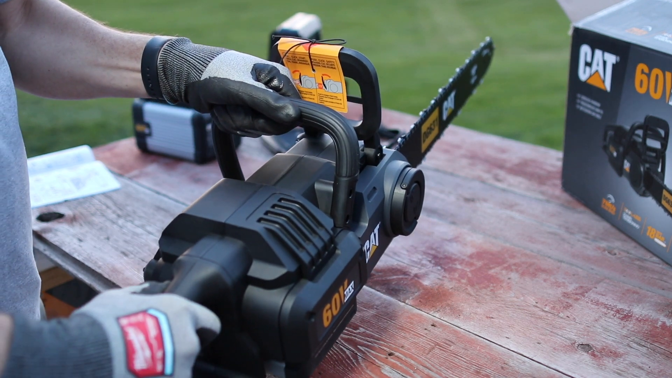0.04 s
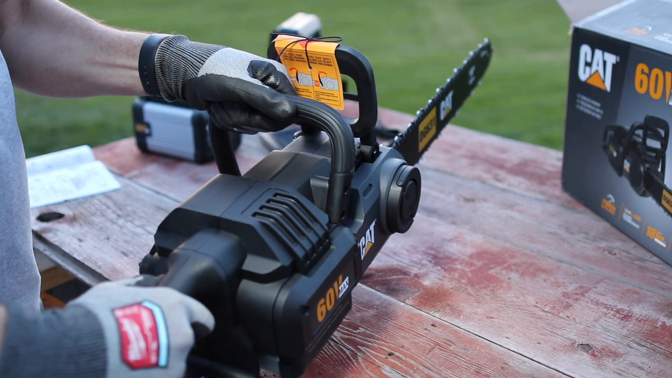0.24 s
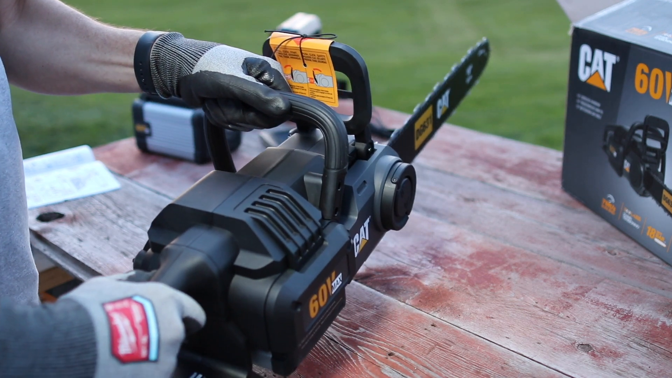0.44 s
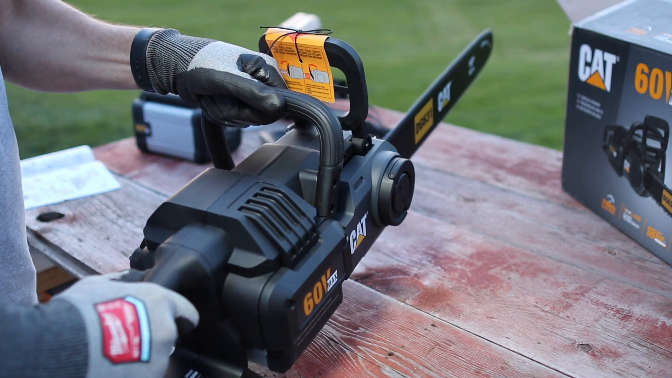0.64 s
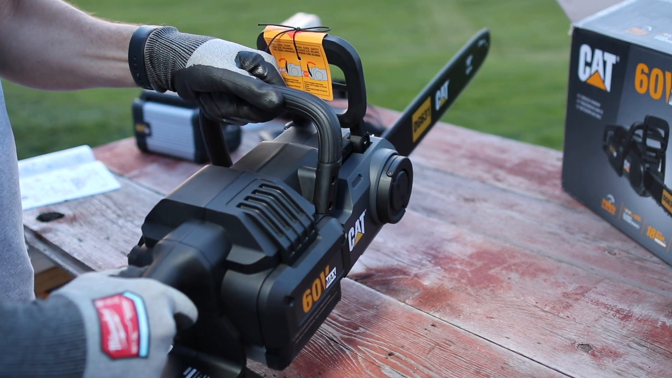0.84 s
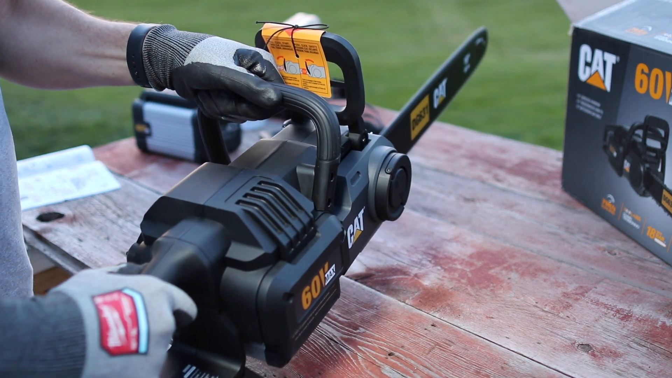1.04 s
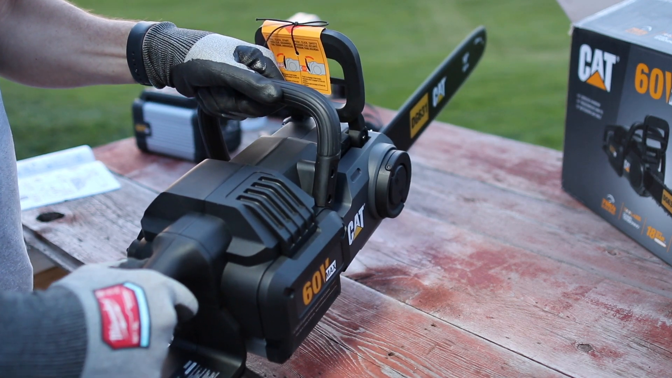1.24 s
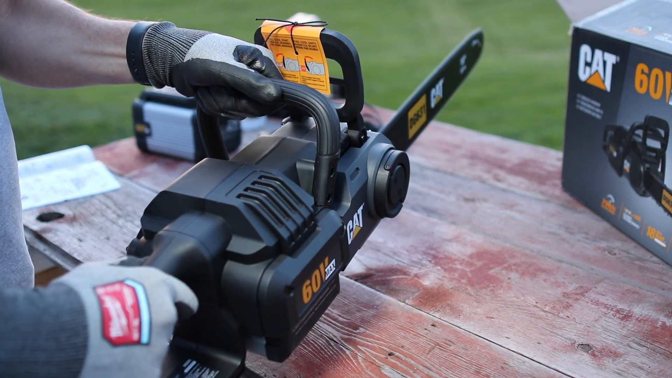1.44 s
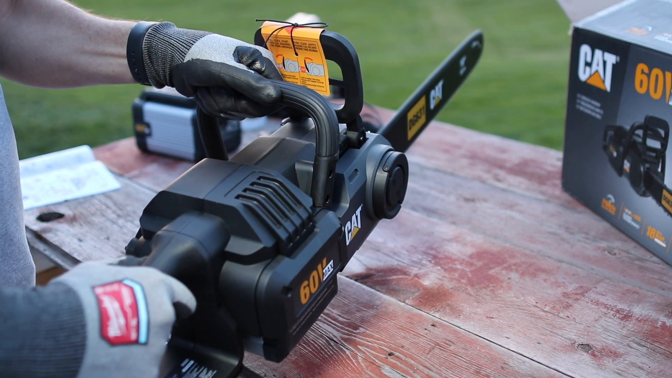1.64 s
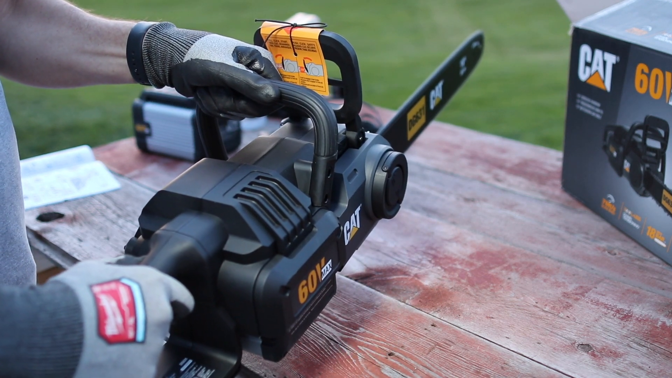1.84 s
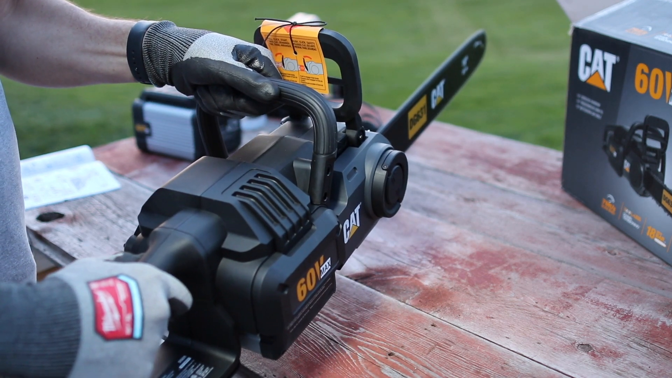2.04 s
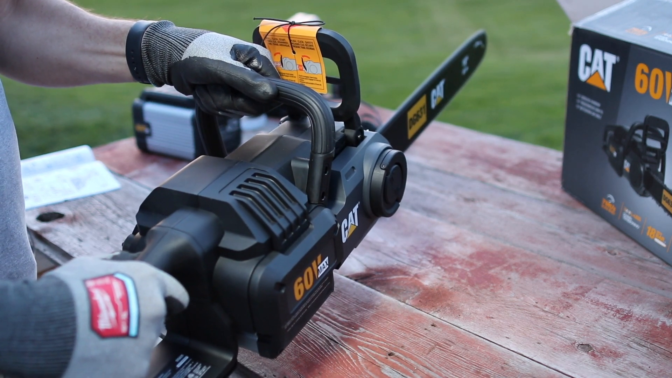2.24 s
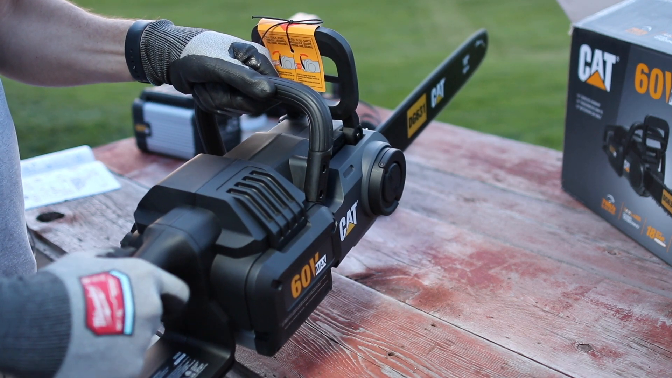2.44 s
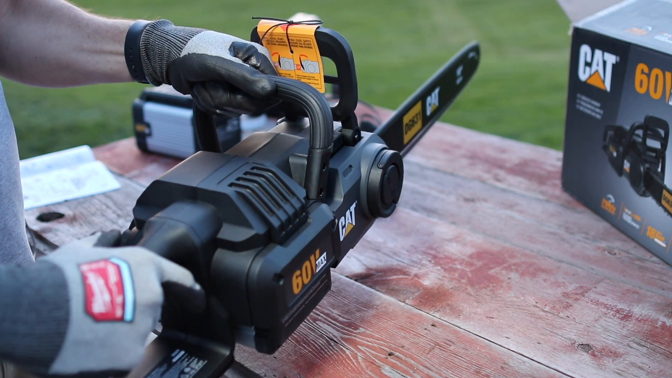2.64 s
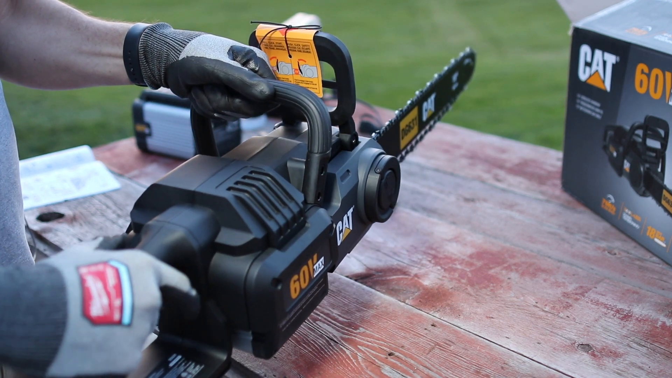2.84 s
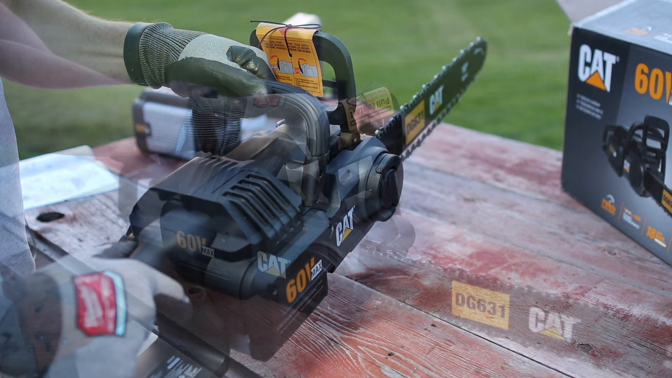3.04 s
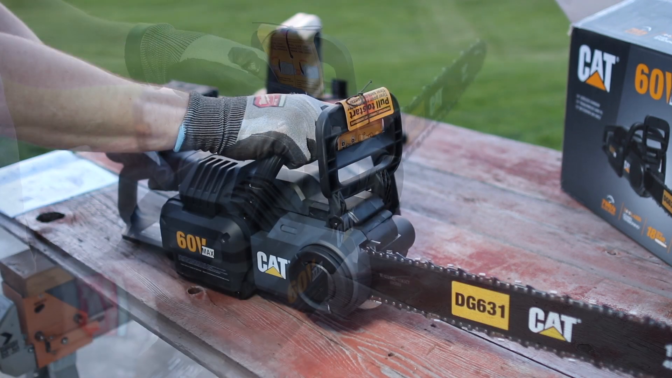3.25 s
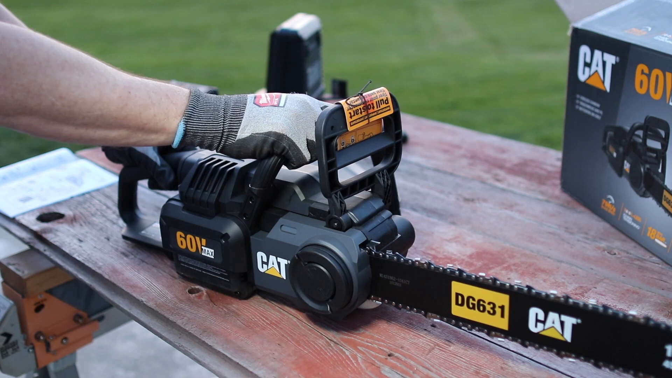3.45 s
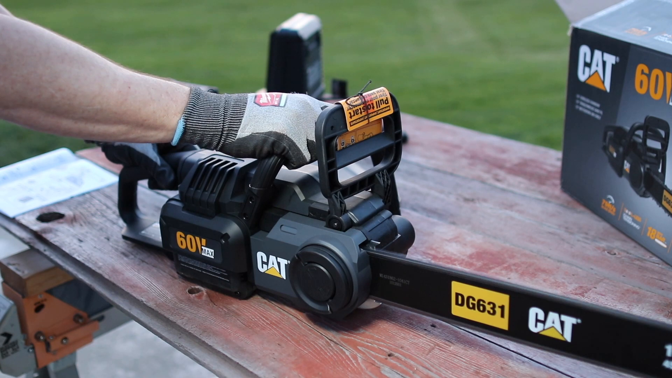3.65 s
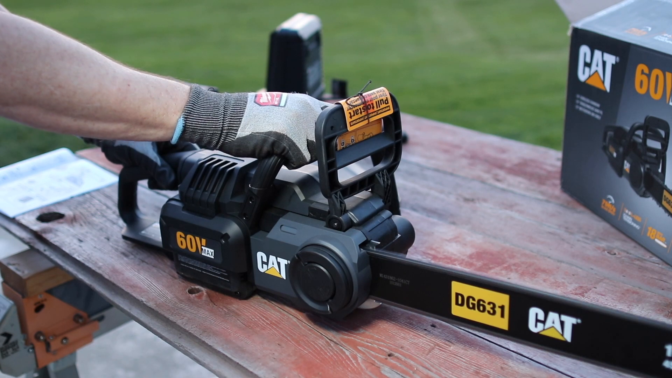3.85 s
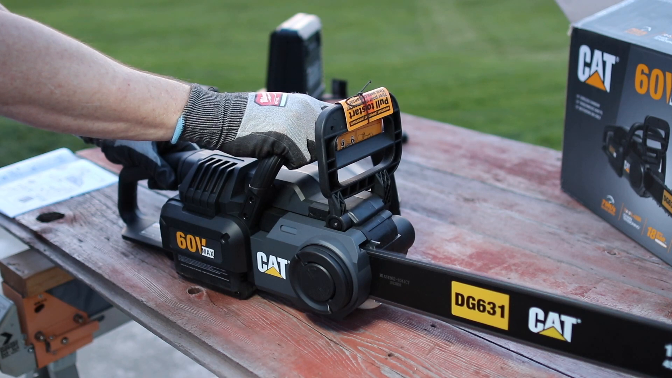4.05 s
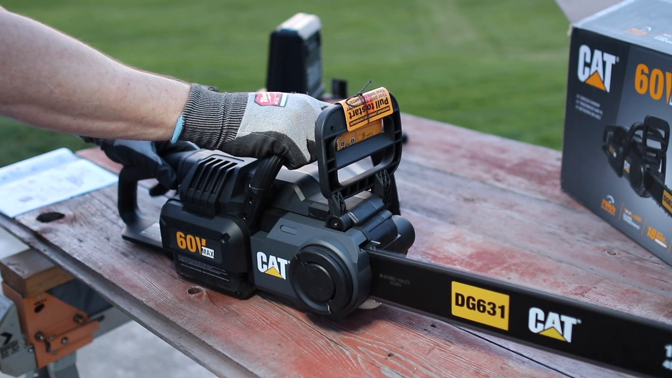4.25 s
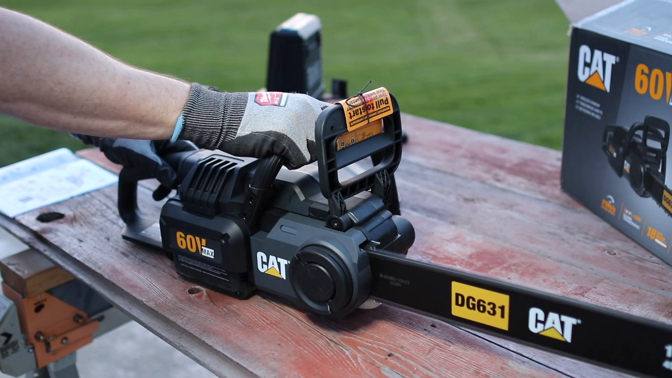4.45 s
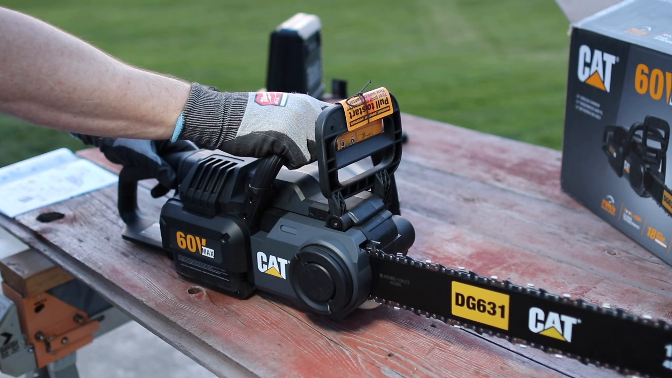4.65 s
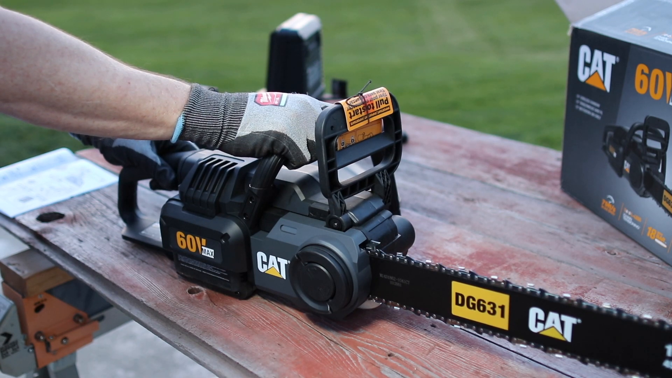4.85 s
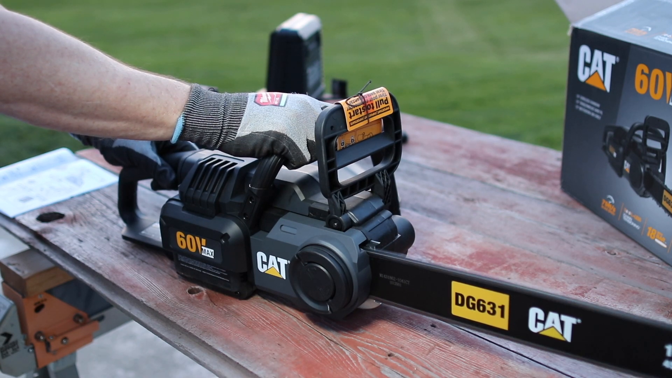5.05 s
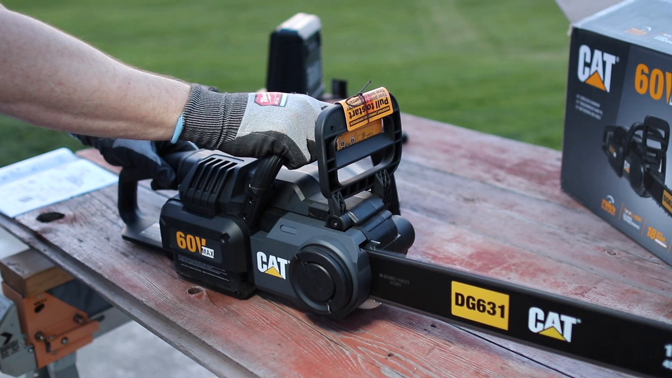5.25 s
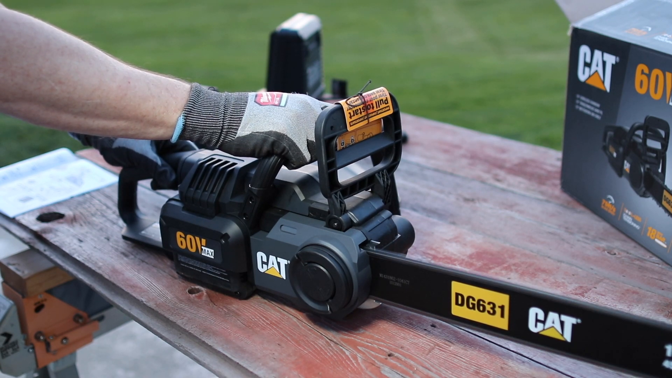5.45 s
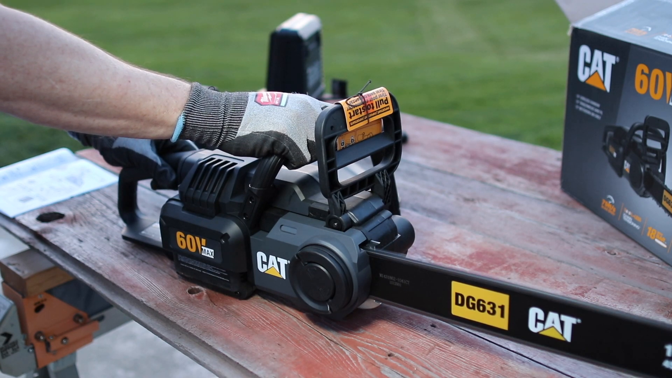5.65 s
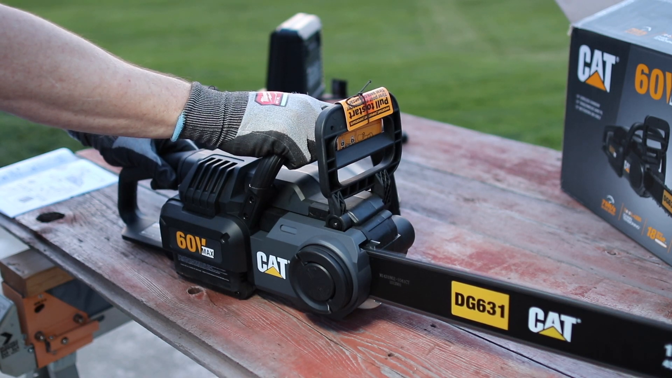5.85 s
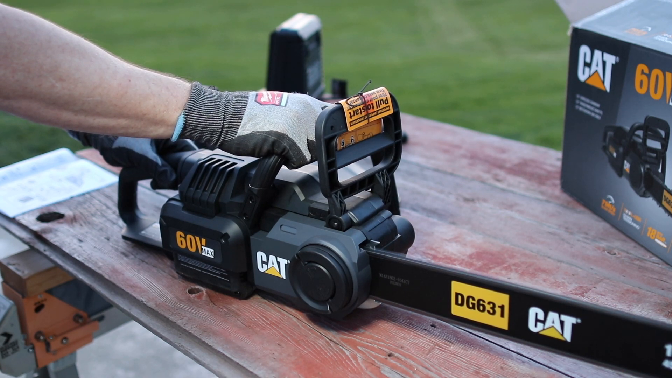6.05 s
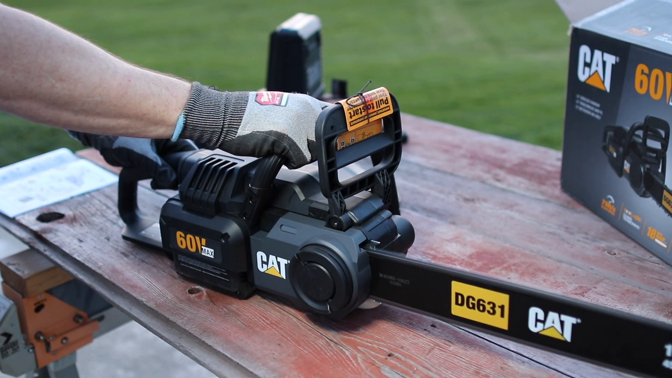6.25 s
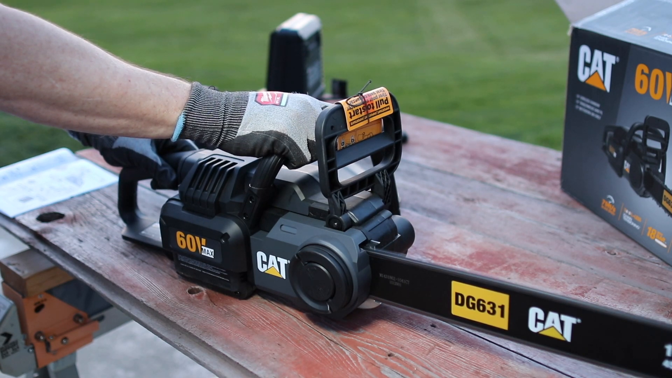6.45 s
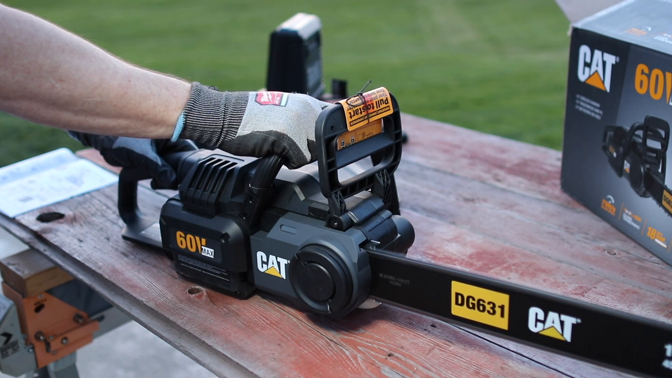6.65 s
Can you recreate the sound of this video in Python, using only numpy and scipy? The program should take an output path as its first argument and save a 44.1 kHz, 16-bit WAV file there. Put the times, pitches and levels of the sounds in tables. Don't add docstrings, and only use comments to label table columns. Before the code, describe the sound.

A cordless electric chainsaw revs freely three times on an outdoor table, trigger clicking, motor whining over hissing chain, quiet garden air between the runs.

```python
import sys
import numpy as np
from scipy import signal
from scipy.fft import rfft, irfft
from scipy.io import wavfile
from scipy.ndimage import uniform_filter1d

SR = 44100
rng = np.random.default_rng(int(sys.argv[2]) if len(sys.argv) > 2 else 0)


def undo_db(level):
    steps = np.asarray(level, float) / 20
    return 10 ** steps


def transcribe(u):
    v = np.clip(np.atleast_2d(u).T, -1, 1)
    q = np.round(v * 32767).astype(np.int16)
    wavfile.write(sys.argv[1], SR, q)


N = 295853
T = np.arange(N) / SR
TURNED_S = 2.5
TOP_HZ = 15830
LINKS = 62

# ramp start in seconds, full cutter rate in Hz, drift in Hz per second,
# trigger release in seconds, braking in Hz per second.
SPEEDS = [
    (.411, 623.15, 5, 2.49, 2220),
    (3.506, 623, 0, 4.233, 2310),
    (4.930, 622.25, -4.5, 7, 2250),
]
# time in seconds, level in dB.
LEVELS = [
    [(.47, -14.5), (.48, -34), (.5, -25.5), (.53, -15.5), (1.0, -17.5), (2.6, -18.5), (2.64, -25),
     (2.75, -27), (2.792, -35), (2.81, -54), (2.83, -51)],
    [(3.52, -26.5), (3.544, -30), (3.559, -28), (3.57, -16), (3.678, -17), (3.768, -18.5), (4.3, -21.5),
     (4.44, -20.5), (4.49, -24.5), (4.55, -65)],
    [(4.94, -36), (4.96, -33), (4.978, -29.5), (4.99, -23), (5.004, -20), (5.048, -16), (5.25, -19.5),
     (5.4, -18.5), (5.7, -21.5), (6.709, -23)],
]


def unit(x):
    return x / np.sqrt(np.mean(x ** 2))


def walk(rate):
    k = int(SR / rate)
    held = np.repeat(rng.standard_normal(N // k + 1), k)
    return 1.3 * uniform_filter1d(uniform_filter1d(held, k), k)[:N]


def band(x, lo, hi):
    return signal.sosfilt(signal.butter(2, [lo, hi], "band", fs=SR, output="sos"), x)


def lowpass(x, hz, order):
    return signal.sosfilt(signal.butter(order, hz, fs=SR, output="sos"), x)


def colour(x, shape, modes=(), echo=(0, 0), size=4096):
    hz = np.maximum(np.arange(size // 2 + 1) * SR / size, 1)
    shape_hz, shape_db = np.transpose(shape)
    db = np.interp(np.log(hz), np.log(shape_hz), shape_db)
    for f, width, lift_db in modes:
        db = db + lift_db / (1 + (2 * (hz - f) / width) ** 2)
    cepstrum = irfft(np.log(undo_db(db)))
    cepstrum[1:size // 2] *= 2
    cepstrum[size // 2 + 1:] = 0
    bounce = 1 + echo[1] * np.exp(-2j * np.pi * hz * echo[0])
    return signal.fftconvolve(x, irfft(np.exp(rfft(cepstrum)) * bounce))[:N]


def garden():
    # frequency in Hz, dB per Hz.
    air_shape = [(15, -41.5), (25, -8), (48, -10.5), (76, 1), (489, -7.5), (1040, -12), (1370, -23),
                 (2110, -22), (4140, -24.5), (5730, -30), (16000, -38)]
    # time in seconds, level in dB.
    ambient_db = [(0, -53), (.074, -48.5), (.2, -61), (.44, -51), (2.86, -61.5), (3.216, -54.5),
                  (3.376, -58.5), (3.5, -56.5), (4.55, -46.5), (4.62, -59), (4.796, -62.5), (4.878, -56),
                  (4.93, -63)]
    # time in seconds, level in dB.
    gusts_db = [(0, -61), (.12, -63), (.3, -54.5), (.5, -58), (2.6, -62.5), (2.75, -68.5), (3.1, -67.5),
                (3.25, -58), (3.45, -62.5), (4.5, -62), (4.65, -73), (4.8, -62.5), (6.7, -67)]
    modes = [(1413, 460, 14.0), (3100, 710, 4.9), (4630, 800, 4)]  # Hz, width Hz, lift dB
    air = colour(rng.standard_normal(N), air_shape, modes)
    leaves = colour(rng.standard_normal(N), air_shape, modes)
    traffic_db = np.interp(T, *np.transpose(ambient_db))
    wind_db = np.interp(T, *np.transpose(gusts_db))
    traffic = undo_db(traffic_db + 2.5 * walk(8.3)) * unit(band(air, 120, 2600))
    rustle = undo_db(traffic_db - 6 + 2 * walk(25)) * unit(band(leaves, 1500, 16000))
    wind = undo_db(wind_db + 3 * walk(9)) * unit(band(air, 22, 150))
    return traffic + rustle + wind


def microphone_hiss():
    # time in seconds, level in dB.
    hiss_db = [(0, -63), (3.1, -78), (3.25, -64), (3.5, -61.5), (4.6, -76), (6.7, -76)]
    return undo_db(np.interp(T, *np.transpose(hiss_db))) * rng.standard_normal(N)


def whistles(rows):
    out, waver = np.zeros(N), walk(90)
    for start, end, hz0, hz1, db in rows:
        span = slice(int(start * SR), int(end * SR))
        along = np.clip((T[span] - start) / (end - start), 0, 1)
        pitch = hz0 + (hz1 - hz0) * along ** 1.8
        swell = np.sqrt(np.sin(np.pi * along))
        level = undo_db(db + 2.5 * np.roll(waver, hz0)[span])
        out[span] += level * swell * np.sin(2 * np.pi * np.cumsum(pitch) / SR)
    return out


def far_engine():
    # start and end in seconds, start and end pitch in Hz, level in dB.
    hums = [(0, .14, 1450, 1400, -58), (2.7, 2.95, 1110, 1120, -57), (2.93, 3.25, 1110, 1260, -57),
            (2.8, 3.05, 690, 700, -64), (2.8, 3.05, 530, 545, -65), (4.17, 4.33, 190, 190, -46),
            (2.66, 2.9, 165, 160, -58), (2.9, 3.04, 165, 155, -55), (2.98, 3.2, 2850, 3000, -64),
            (3.4, 3.435, 3050, 3000, -60), (4.48, 4.6, 175, 150, -47), (4.48, 4.59, 250, 230, -49),
            (4.5, 4.75, 310, 290, -60), (4.6, 4.75, 250, 250, -63), (3.16, 3.22, 160, 190, -55),
            (.21, .29, 1150, 1140, -59)]
    return whistles(hums)


def birds():
    # start and end in seconds, start and end pitch in Hz, level in dB.
    chirps = [(.06, .1, 3600, 4600, -62), (.08, .1, 4600, 5200, -63), (.33, .365, 4700, 4500, -61),
              (.33, .36, 4150, 4050, -60), (.4, .44, 3850, 3750, -62), (3.09, 3.12, 4200, 3900, -69),
              (3.27, 3.3, 4300, 3700, -60), (3.43, 3.48, 4350, 3300, -55), (3.49, 3.51, 3700, 3900, -57)]
    return whistles(chirps)


def snaps(rows, pure, rough, snap_t60, less_db, rise):
    # frequency in Hz, width in Hz, lift in dB.
    crack_modes = [(4900, 800, 12), (6700, 1000, 12), (8700, 800, 2), (15000, 1500, 3)]
    crack_shape = [(1500, -18), (3000, 5), (16000, -23)]  # Hz, dB
    crack_t60, handle_t60, thud_t60 = 0.013, 0.066, 0.19
    handle_hz, handle_near_db, handle_far_db = 382, -22, -33.5
    out, t = np.zeros(N + 4000), np.arange(4000) / SR
    for s, db, hz, crack_db in rows:
        turned = s > TURNED_S
        noise = rng.standard_normal((4, len(t)))
        ring = pure * np.sin(2 * np.pi * hz * t)
        ring += rough * .3 * unit(band(noise[0], hz / 1.2, hz * 1.2))
        ring += rough * .53 * unit(band(noise[3], 500, 2800))
        decay = undo_db(-60 * t / snap_t60)
        crack = unit(colour(noise[1], crack_shape, crack_modes * turned, size=256)[:len(t)])
        crack *= undo_db(-60 * t / crack_t60) + 0.05 * decay
        snap = decay * np.minimum(t * hz / rise, 1) * 0.54 * ring + undo_db(crack_db - 5) * crack
        handle_db = handle_far_db if turned else handle_near_db
        handle = undo_db(handle_db - 60 * t / handle_t60) * np.sin(2 * np.pi * handle_hz * t)
        thud_db = -40.5 - 0.53 * db + less_db + 2.5
        thud = undo_db(thud_db - 60 * t / thud_t60) * unit(band(noise[2], 30, 220))
        start = int((s + .001) * SR)
        out[start:start + len(t)] += undo_db(db) * (snap + handle + thud)
    return out[:N]


def trigger_clicks():
    # time in seconds, peak in dB, ring in Hz, crack in dB.
    contacts = [(.154, -34, 2470, -1), (0.158, -19.5, 500, -15), (0.167, -26, 500, -14),
                (0.1817, -12.5, 1290, 1.5), (0.191, -13.5, 1900, -21), (.191, -15, 410, -40),
                (0.212, -24.5, 2680, -0.5), (2.616, -12, 302, -27.5), (2.62, -13, 90, -49),
                (2.833, -42, 2400, 2), (2.845, -38, 1050, -22), (2.883, -49, 1120, 0),
                (2.929, -37, 1190, -32), (3.067, -36.5, 2100, -15), (3.189, -37, 2180, 1),
                (3.196, -37.5, 2500, 0), (3.201, -31, 260, -39), (3.204, -37, 1100, -30),
                (3.2383, -16, 2980, -2), (3.24, -10, 915, -34), (3.269, -37, 4800, -7),
                (3.272, -36, 2700, -16), (3.5095, -23, 4330, -14), (4.788, -38, 2380, -12),
                (4.805, -28, 606, -22), (4.8228, -29, 3000, -3), (4.8258, -9.5, 844, -6.5),
                (4.837, -12, 1870, -12), (4.932, -27, 4170, -17)]
    return snaps(contacts, pure=0.52, rough=0.99, snap_t60=.032, less_db=-2, rise=1.4)


def cutter(start, full_hz, drift, release, brake):
    inertia_s, brake_lag_s, brake_bite_s = .05, .04, .07
    up = np.clip(np.minimum(T, release) - start, 0, None)
    down = np.clip(T - release - brake_lag_s, 0, .5)
    down = uniform_filter1d(down, int(brake_bite_s * SR))
    ramp = 956 * up - 186 * np.minimum(up, 1) ** 2
    hz = np.minimum(ramp, full_hz + drift * (up - .8))
    hz = uniform_filter1d(hz, int(inertia_s * SR))
    hz = hz - brake * down + 1900 * down ** 2
    return np.maximum(hz, 20), np.clip(down / brake_lag_s, 0, 1)


def lap(link, side, size=4096):
    # beats per lap, dB over the scrape from behind, dB from the bar side.
    worn_links = [(13, 0, -6), (25, 0, 1), (44, 2, -6), (49, -1, 1), (55, -6, 4), (61, 1, 4), (63, 0, 2),
                  (69, -6, 4), (75, 6, 1), (87, 6, 2), (91, -6, 5), (95, 3, 0), (97, -6, 6), (107, -6, 5),
                  (111, 3, 5), (117, -6, 3), (122, -6, 3), (133, -6, 4), (160, 3, 1), (169, -6, 4),
                  (217, 1, 6), (224, -6, 4), (228, -6, 3), (257, -6, 3), (341, -8, 3), (403, 2, -8),
                  (434, 1, 2)]
    lap_db, fade_beats = (-7, -3)[side], 220
    beats = np.arange(size // 2 + 1)
    chance = rng.standard_normal((2, len(beats)))
    lines = undo_db(lap_db) * (chance[0] + 1j * chance[1]) / np.sqrt(2)
    lines = lines / (1 + (beats / fade_beats) ** 2)
    for beat, *db in worn_links:
        lines[beat] *= undo_db(db[side]) / abs(lines[beat])
    table = irfft(lines) * size * .0213
    return np.interp(link / LINKS % 1 * size, np.arange(size + 1), np.append(table, table[0]))


def chain(turns, taut, side, wear_db=-2.5, scatter_db=-0.5, scrape=0.8, strike_db=-16.5):
    link = 6 * turns
    count = link.astype(int)
    wear, sign = rng.standard_normal((2, LINKS))
    scatter = rng.standard_normal(count[-1] + 1)[count]
    size = undo_db(wear_db * wear[count % LINKS] + scatter_db * scatter)
    strikes = np.diff(count, prepend=0) * size * sign[count % LINKS]
    scrapes = rng.standard_normal(N) * (1 + size * np.exp(-(link - count) / scrape))
    return undo_db(strike_db) * unit(strikes) + unit(scrapes) + taut * lap(link, side)


def tones(turns, hz, orders, levels_db):
    out = 0
    for k, db in zip(orders, levels_db):
        waver_db = np.interp(hz, [195, 205], [1.5, .4]) * walk(29.98)[:len(hz)]
        audible = k * hz < TOP_HZ
        out = out + undo_db(db + waver_db) * audible * np.sin(2 * np.pi * k * turns + k * k)
    return out


def motor_song(turns, cutter_hz, shaft_hz, braking, tone_db, torque_db, live, side):
    teeth_turns = [2, 3, 5, 6, 8, 9, 12, 15, 18, 24]
    pole_turns = [7, 14, 28, 42]
    # level in dB, then dB added when slow, at full speed, while braking.
    teeth = [
        [(-13, -5, 1.5, -4), (-2.5, -8, -2.5, 1), (-8.5, -2, -1, 0), (4, -4, -1.5, 1), (-14, 1, -1, 1),
         (-9.5, -7, 1.5, 4.5), (-2.5, -4.5, -5, -12), (-15, 2, -4, 3), (-14.5, 0.5, 3, -3), (-15.5, 4, -1.5, 1)],
        [(-34, 0, -2, 0), (-2, -2, -0.5, 4), (-17.5, 0, -0.5, 1), (3, -1.5, 0, 5), (-10, -4, 7, 0),
         (-8, -5, -5, 0), (0.5, 3, 0, -1.7), (-15, -5, -4, 0), (-5.5, 9.5, 6, 1), (-22, 16.5, 10, 0)],
    ]
    # start and end in seconds, level in dB.
    pole_pulls = [
        [(2.55, 2.63, -11.5), (4.28, 4.33, -9)],
        [(2.543, 2.642, 0.5), (4.28, 4.32, 1), (4.32, 4.352, 8)],
        [(2.56, 2.582, 1), (2.584, 2.598, -1)],
        [(0.546, 0.574, -2)],
    ]
    slow = np.interp(cutter_hz, [200, 450], [1, 0])
    full = np.interp(cutter_hz, [585, 615], [0, 1])
    levels_db = []
    for k, (db, slow_db, full_db, brake_db) in zip(teeth_turns, teeth[side]):
        by_speed_db = torque_db if k > 6 else tone_db
        state_db = slow_db * slow * (1 - braking) + full_db * full + brake_db * braking
        levels_db.append(db + state_db + by_speed_db)
    for rows in pole_pulls:
        lift = sum((db + 61.5) * (T > start) * (T < end) for start, end, db in rows)
        levels_db.append(uniform_filter1d(lift, size=300) - 61.5)
    sines = np.zeros(N)
    live_db = [db[live] for db in levels_db]
    sines[live] = tones(turns[live], shaft_hz[live], teeth_turns + pole_turns, live_db)
    return sines


def saw(speed, level, shape, modes, nulls, echo, side):
    # cutter rate in Hz, hiss in dB, sprocket tone in dB, torque whine in dB.
    by_speed = [
        [(40, -1.5, -6, -7), (121, -12.5, -23, 0), (183, -5.5, 4, 9.5), (250, -7.5, -19, -5),
         (315, -4.5, -6.5, -2), (363, -4, -0.5, -0.5), (400, -5.5, -2.5, 1), (440, -4, -8, -3.5),
         (530, -5, -4.5, -7), (595, -6, -5, -12), (606, -4.5, -4.5, -14.5)],
        [(49.7, -7.5, 13, 4), (118, -7.5, -4, -11), (150, -7, -5, -9), (183, -7.5, -1, -5.5),
         (224, -8, -6, -2.5), (265, -5.5, -19, -6), (338, -4.5, -14, -4), (488, -4, -2.5, 1.5),
         (540, -5, -6, -6), (590, -1.5, -6.5, 0.5), (605, -2, -2, -2.5)],
    ]
    # dB added while braking to hiss, sprocket tone and torque whine.
    brake_mix_db = [
        (0, -0.5, 4.5),
        (0, -6, -0.5),
    ]
    rumble_hz, slap, damped = (318, 420)[side], (0.53, 1.45)[side], (0.32, 0)[side]
    cutter_hz, braking = cutter(*speed)
    level_s, level_db = np.transpose(level)
    db = np.interp(T, level_s, level_db)
    on = uniform_filter1d(1. * (T > level_s[0]) * (T <= level_s[-1]), size=400)
    at_hz, *mix = np.transpose(by_speed[side])
    hiss_db, tone_db, torque_db = (np.interp(cutter_hz, at_hz, column) + brake * braking
                                   for column, brake in zip(mix, brake_mix_db[side]))
    hiss_db = hiss_db + 6 * np.interp(T, [2.595, 2.628, 2.628 + .006], [0, 1, 0])

    shaft_hz = cutter_hz / 3 * (1 + .0006 * walk(12))
    turns = np.cumsum(shaft_hz) / SR
    rattle = colour(chain(turns, cutter_hz / speed[1], side), shape, modes, echo)
    hiss = signal.sosfilt(signal.butter(3, 3700, "high", fs=SR, output="sos"), rattle)
    body = lowpass(rattle, 3700, 3)
    rumble = lowpass(body, rumble_hz, 2)
    body = body - rumble * (1 - np.clip(shaft_hz / 200, 0, 1.1) ** 2.2)

    sines = motor_song(turns, cutter_hz, shaft_hz, braking, tone_db, torque_db, on > 0, side)
    driven = [(f, width, 1.13 * lift_db) for f, width, lift_db in modes]
    sung = colour(sines, shape, driven + nulls, echo) / np.std(body)
    sung = band(sung, 310, 15000)
    slack = np.clip(1 - cutter_hz / 300, 0, 1)
    sung = sung * undo_db(-6 * slack)
    body = body + slap * slack * undo_db(2.5 * walk(120)) * band(body, 550, 1500)
    body = body - damped * np.minimum(2 * slack, 1) * band(body, 970, 1300)
    flutter = undo_db(0.29 * walk(17))
    noise = flutter * (body / np.std(rattle) + undo_db(hiss_db) * unit(hiss))
    return on * undo_db(db) * (noise + undo_db(-3) * sung)


def run_from_behind():
    # frequency in Hz, dB per Hz.
    shape = [(18, -57), (30, -29), (233, -18.5), (415, -13.5), (569, -8.5), (616, -8), (937, -4),
             (1220, -4.5), (1320, -5.5), (1540, -0.5), (2480, -7), (11700, -9), (16000, -15.5)]
    # frequency in Hz, width in Hz, lift in dB.
    modes = [(361, 130, 5), (1077, 104, 7), (1560, 91, 1.5), (2100, 120, 3.5), (2415, 71, 0),
             (3230, 81, 3.5), (2815, 220, 4), (4340, 220, 2.5), (5500, 220, 3), (6170, 69, -7.5),
             (6570, 160, 2.5)]
    shroud = [(8760, 50, 5.5)]
    # frequency in Hz, width in Hz, lift in dB.
    nulls = [(800, 640, -10.5), (900, 90, -4), (1400, 420, -11), (1900, 60, -2), (2260, 240, -4.5),
             (3320, 1200, -8.5)]
    table_echo = (0.000342, 0.095)
    return saw(SPEEDS[0], LEVELS[0], shape, modes + shroud, nulls, table_echo, side=0)


def controller():
    # start and end in seconds, start and end pitch in Hz, level in dB.
    coil_tones = [(0.453, 0.459, 11800, 11500, -23), (.458, 0.511, 12000, 11860, -37),
                  (0.461, 0.51, 6050, 5960, -45), (3.511, 3.516, 11400, 11400, -33),
                  (3.518, 3.56, 11940, 12000, -52.5), (4.934, 4.937, 11200, 11000, -47),
                  (5.01, 5.054, 167, 165, -34), (3.575, 3.632, 175, 161, -33)]
    return whistles(coil_tones)


def chain_snatches():
    # time in seconds, peak in dB, ring in Hz, crack in dB.
    jerks = [(0.4532, -20, 2760, 7), (0.456, -13, 1500, -10), (0.4605, -9, 1930, -28),
             (0.4652, -1, 400, -42), (.4656, -24, 725, -29), (0.4688, -2.5, 1220, -28),
             (0.466, -2, 1430, -43), (0.4655, -7.5, 2920, -23), (0.5041, -4, 1306, -21),
             (0.508, -1.5, 970, -29), (0.51, -6, 1170, -23), (.519, -22, 1090, -16),
             (3.5135, -14, 790, -30), (3.5153, -2, 1290, -30), (3.52, -8, 1210, -39),
             (3.5367, -12.5, 2310, -3.5), (3.539, -6, 856, -32), (3.563, -9, 1290, -24),
             (4.9424, -10, 790, -32), (4.986, -7, 865, -18)]
    return snaps(jerks, pure=2.3, rough=1.8, snap_t60=0.0137, less_db=-14, rise=0.86)


def knocks():
    # time in seconds, peak in dB, ring in Hz, swell in seconds.
    hits = [(.4657, -3.5, 597, 0.00086), (.4665, -9, 1400, .0015), (.5055, -11, 1310, 0.0032),
            (3.2397, -21, 4880, 0.00089), (3.2399, -18.5, 6630, 0.00051), (3.2399, -36, 8800, 0.00047),
            (3.5168, 0, 800, 0.001), (3.517, -14.5, 2210, 0.0017), (3.5385, -16, 2310, .001),
            (4.8264, -40, 4900, 0.00038), (4.8264, -29, 6550, 0.00054), (4.8374, -22, 6100, 0.00051),
            (4.8374, -31, 4460, .0006), (4.8374, -28, 8200, 0.00045)]
    out, t = np.zeros(N + 1000), np.arange(1000) / SR
    for s, db, hz, swell in hits:
        start = int(s * SR)
        envelope = t / swell * np.exp(1 - t / swell)
        out[start:start + len(t)] -= undo_db(db) * envelope * np.sin(2 * np.pi * hz * t)
    return out[:N]


def brake_squeal():
    # start and end in seconds, start and end pitch in Hz, level in dB.
    squeals = [(2.606, 2.628, 4200, 4000, -22), (2.595, 2.62, 5850, 5400, -23),
               (2.598, 2.616, 7250, 6850, -27), (2.612, 2.63, 6850, 6600, -19),
               (2.608, 2.625, 8250, 7800, -23), (2.617, 2.625, 7400, 7250, -24),
               (2.61, 2.622, 11800, 11600, -27), (2.541, 2.553, 1380, 1300, -18)]
    return whistles(squeals)


def runs_from_bar_side():
    # frequency in Hz, dB per Hz.
    shape = [(18, -84.5), (30, -28.5), (554, -11.5), (616, -3.5), (866, -12.5), (988, -8), (1500, -8.5),
             (2290, -7.5), (3140, -12.5), (4910, -10.5), (6380, -11), (11700, -13.5), (16000, -21)]
    # frequency in Hz, width in Hz, lift in dB.
    modes = [(806, 100, 6), (1014, 210, 7), (1290, 110, 7.5), (1763, 84, 3), (2310, 58, 6), (2680, 87, 7.5),
             (4200, 280, -2.5), (4530, 370, 3.5), (5040, 370, 4), (6470, 570, -7.5), (7100, 790, 3),
             (8540, 980, -3)]
    # frequency in Hz, width in Hz, lift in dB.
    nulls = [(407, 235, -10), (865, 45, -9.5), (1137, 25, -9), (1450, 90, -3.5), (1593, 185, -18),
             (1900, 69, -2), (3230, 1260, -25.5)]
    table_echo = (0.000422, 0.13)
    return sum(saw(speed, level, shape, modes, nulls, table_echo, side=1)
               for speed, level in zip(SPEEDS[1:], LEVELS[1:]))


def scene():
    surroundings = garden() + microphone_hiss() + far_engine() + birds()
    contacts = trigger_clicks() + chain_snatches() + knocks()
    runs = run_from_behind() + runs_from_bar_side()
    mono = surroundings + contacts + runs + controller() + brake_squeal()
    return np.array([mono, mono])


def roll_off(x):
    return signal.sosfilt(signal.butter(12, 17040, fs=SR, output="sos"), x)


def record(dry):
    mono = 1.25 * np.tanh(.86 * dry[0])
    treble = band(band(mono * rng.standard_normal(N), 3900, 16000), 3900, 12500)
    grit = treble * (walk(40) > .9) * undo_db(-14)
    grit = grit + mono * rng.standard_normal(N) * (walk(30) > 1.3) * undo_db(-37)
    top_cut = signal.ellip(10, .2, 80, TOP_HZ, fs=SR, output="sos")
    both = signal.sosfilt(top_cut, [mono + grit, mono - grit])
    return roll_off(both)


dry = scene()
out = record(dry)
transcribe(out)
```